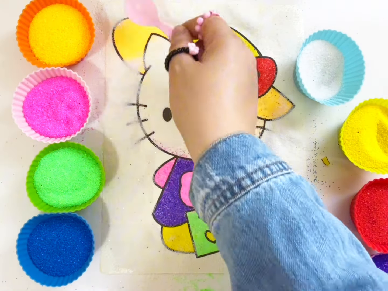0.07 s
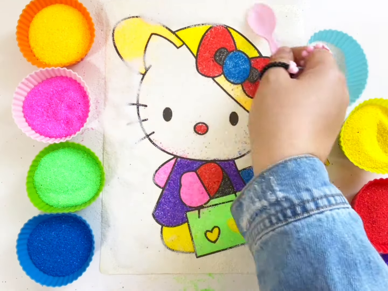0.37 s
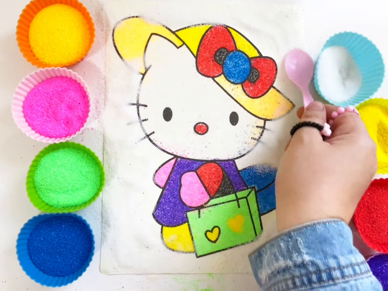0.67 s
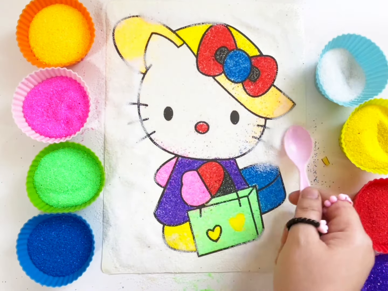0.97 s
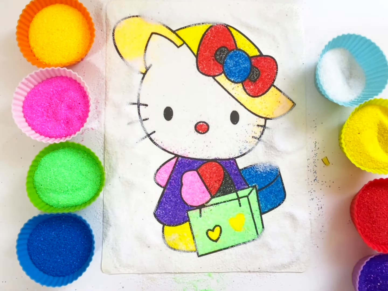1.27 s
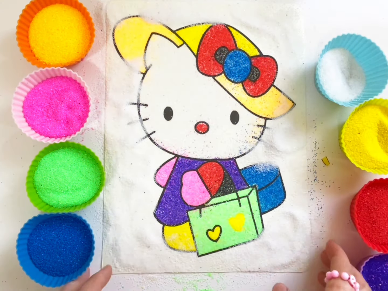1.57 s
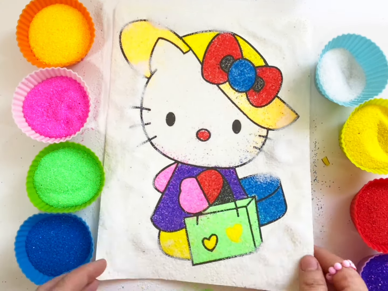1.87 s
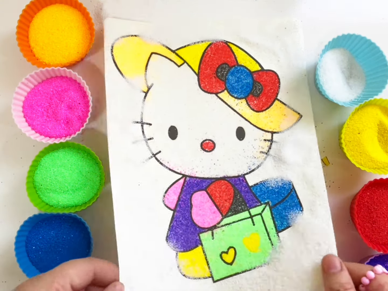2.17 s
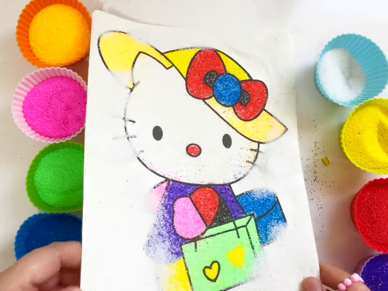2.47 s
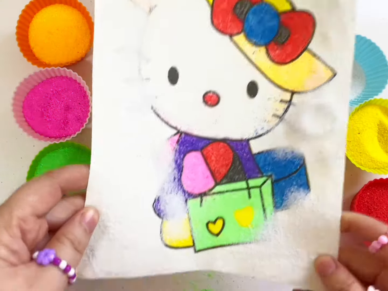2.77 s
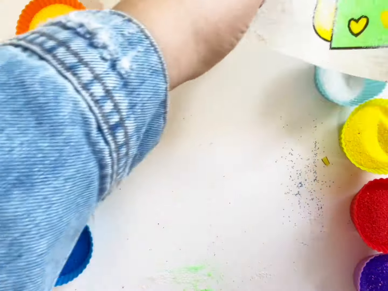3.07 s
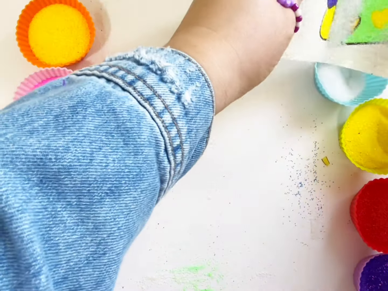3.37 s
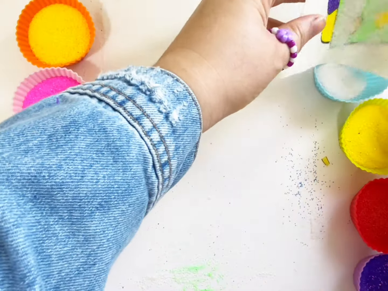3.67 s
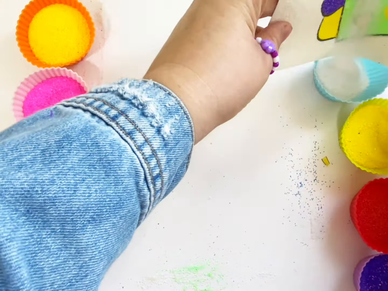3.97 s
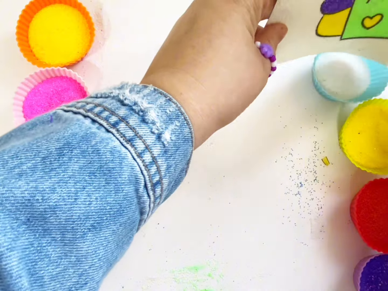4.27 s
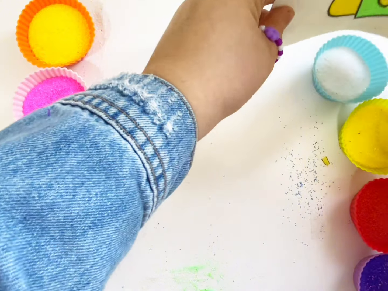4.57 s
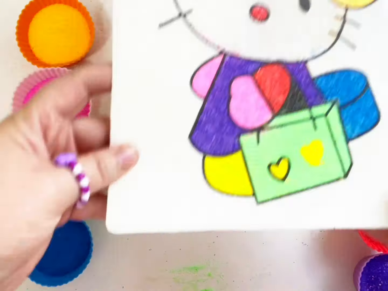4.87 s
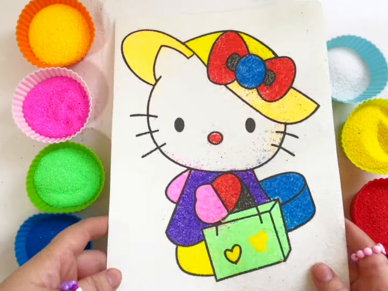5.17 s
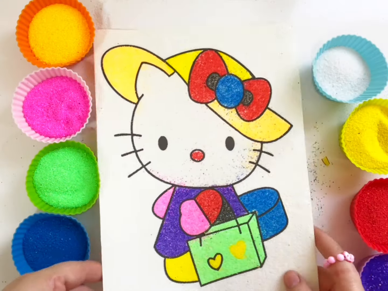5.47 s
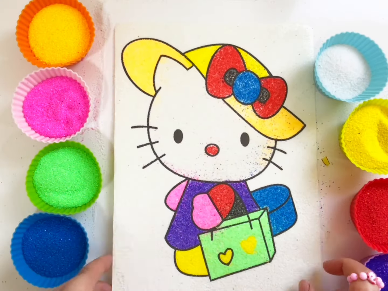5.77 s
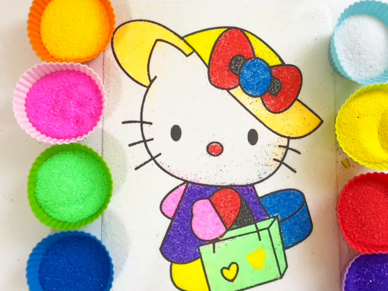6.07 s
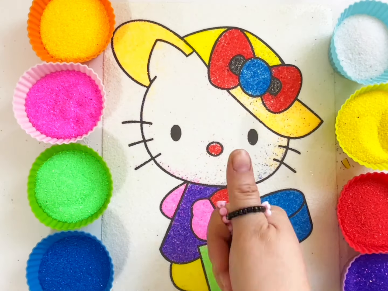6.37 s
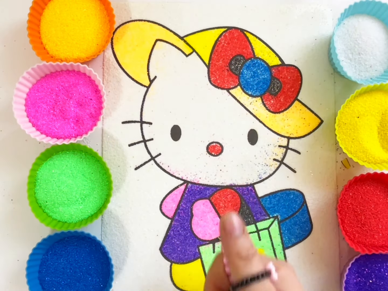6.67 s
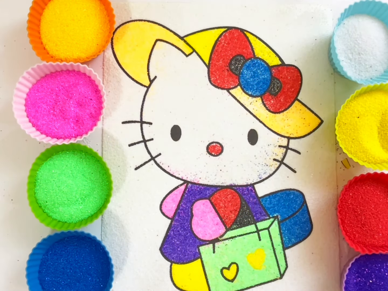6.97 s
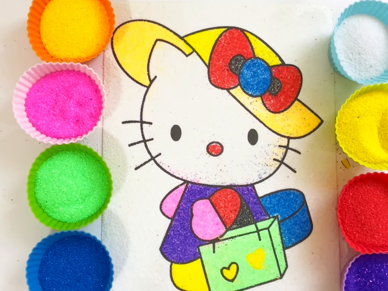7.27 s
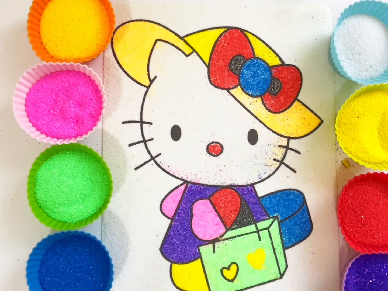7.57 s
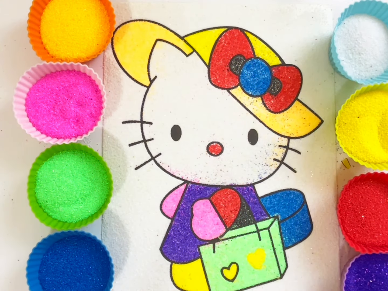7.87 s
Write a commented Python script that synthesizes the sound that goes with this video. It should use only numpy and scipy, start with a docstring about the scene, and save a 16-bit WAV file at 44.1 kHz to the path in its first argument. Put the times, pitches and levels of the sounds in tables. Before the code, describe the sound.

A plastic spoon scrapes sand over paper and clatters down; the sheet crackles as sand hisses off, then is laid back.

```python
"""A plastic spoon crunches sand across a sheet of paper, then clatters onto the table.
The sheet is lifted and tilted: it crackles and buckles, the loose sand hisses off, and it is laid back
with hollow puffs of air. Last, a hand and a denim sleeve brush about over a low room hum.
Heard in a small room, close to two microphone ports."""
import sys
import numpy as np
from scipy import signal
from scipy.fft import rfft, irfft, next_fast_len
from scipy.io import wavfile
from scipy.ndimage import uniform_filter1d

SR = 44100
rng = np.random.default_rng(int(sys.argv[2]) if len(sys.argv) > 2 else 0)


def wav_record(signal):
    """Record a signal, one row per channel, as 16-bit PCM in the file named by sys.argv[1]."""
    frames = np.transpose(np.atleast_2d(signal))
    bounded = np.clip(frames, -1, 1)
    # unit amplitude maps onto the largest positive 16-bit level
    quanta = np.round(bounded * 32767).astype(np.int16)
    wavfile.write(sys.argv[1], SR, quanta)


N = 348831
TIME_S = np.arange(N) / SR
PUSH_ATTACK_S, PUSH_T60_S = 0.018, 0.12   # the spoon bites fast, lets go slowly

# paper snaps and finger taps: time_s, level_db, brightness_db, ring_hz
PAPER_SNAPS = [(1.5775, -53, -5, 690), (1.678, -45, 0, 696), (1.735, -48.5, -6, 2720),
               (1.769, -48, 12, 4870), (1.823, -46, 6, 1590), (1.906, -51, 5, 2230), (2.0623, -43, 2, 1200),
               (2.156, -49, 6.5, 1150), (2.3038, -44.5, 3, 1840), (2.348, -42.5, -2, 4350),
               (2.4776, -42.5, 2.5, 2600), (2.573, -43.5, 5, 1370), (2.8435, -54, 4, 700),
               (3.003, -48, 0, 850), (3.5555, -41.5, -2, 3230), (3.8457, -46.5, -5, 910),
               (4.3034, -42.5, -6, 840), (4.311, -42, -2, 840), (4.4505, -45.5, -10, 770),
               (4.522, -44.5, -4, 834), (4.6648, -56, 4, 700), (4.7788, -51.5, 9, 4530),
               (5.059, -48, -4.5, 750), (5.1449, -41.5, -2.5, 2620), (5.215, -39.5, -3, 2580),
               (5.232, -42, -8.5, 1020), (5.278, -50, 3, 1150), (5.305, -39, -2.5, 2880),
               (5.395, -32.5, -1.5, 2840), (5.4545, -53, -0.5, 2600), (5.4696, -44, -4, 2660),
               (5.4802, -43, 2.5, 1990), (5.5125, -39.5, 4.5, 2320), (5.527, -41, 1, 1510),
               (5.6327, -40.5, 0.5, 2040), (5.647, -41, -1, 2100), (5.7509, -42, -0.5, 1190),
               (5.802, -38, -1.5, 2390)]


def from_db(db):
    """Decibels to gain."""
    return 10 ** (np.asarray(db) / 20)


def unit_rms(x):
    """Scale to unit power."""
    return x / np.sqrt(np.mean(x ** 2) + 1e-20)


def butter(x, kind, cutoff_hz):
    """Butterworth filter, 12 dB per octave."""
    return signal.sosfilt(signal.butter(2, cutoff_hz, kind, fs=SR, output="sos"), x)


def colour(x, spectrum):
    """Unit-energy minimum-phase filter following rows of freq_hz, level_db."""
    size = 2048
    hz, db = np.transpose(spectrum)
    grid_hz = np.maximum(np.fft.rfftfreq(size, 1 / SR), 1)
    cepstrum = irfft(np.log(from_db(np.interp(np.log(grid_hz), np.log(hz), db))))
    cepstrum[1:size // 2] *= 2
    cepstrum[size // 2 + 1:] = 0
    response = irfft(np.exp(rfft(cepstrum)))
    return signal.oaconvolve(x, response / np.linalg.norm(response))[:N]


def held(rows, attack_s, t60_s, arch_db=0):
    """Gain of moves that set in, arch mid-way and decay; the strongest prevails."""
    out = np.zeros(N)
    for start_s, length_s, db in rows:
        first = int(start_s * SR)
        span = slice(first, first + int((length_s + t60_s) * SR))
        age_s = TIME_S[span] - start_s
        bow_db = arch_db * (np.sin(np.pi * np.minimum(age_s / length_s, 1)) - 2 / np.pi)
        decay_db = 60 * np.maximum(age_s - length_s, 0) / t60_s
        gain = np.clip(age_s / attack_s, 0, 1) * from_db(db + bow_db - decay_db)
        out[span] = np.maximum(out[span], gain)
    return out


def swells(rows, fall_s):
    """Gain of moves that rise and fall 20 dB per rise_s (10 ms at least) and fall_s; powers add."""
    power = np.zeros(N)
    for peak_s, rise_s, db in rows:
        rise_s = max(rise_s, 0.01)
        span = slice(max(int((peak_s - 2 * rise_s) * SR), 0), int((peak_s + 2 * fall_s) * SR))
        age_s = TIME_S[span] - peak_s
        power[span] += from_db(db - 20 * np.maximum(-age_s / rise_s, age_s / fall_s)) ** 2
    return np.sqrt(power)


def contacts(rows, tilt=0):
    """One impulse per row; tilt (-1 bass, +1 treble) weights its brightness."""
    out = np.zeros(N)
    for time_s, db, *brightness_db in rows:
        out[round(time_s * SR)] += from_db(db + tilt * sum(brightness_db))
    return out


def bursts(impulses, t60_s, spread_s=0):
    """Each contact starts decaying noise; spread_s smears one that gives way gradually."""
    power = signal.lfilter([1], [1, -from_db(-120 / (t60_s * SR))], impulses ** 2 + 1e-24)
    power = np.maximum(uniform_filter1d(power, 1 + int(spread_s * SR)), 0)
    return np.sqrt(power) * rng.standard_normal(N)


def grains(per_s, spread_db, t60_s):
    """Random tiny contacts, most weak, a few strong; unit power."""
    sizes = from_db(spread_db * np.minimum(rng.exponential(1, N), 4))
    hits = rng.random(N) < per_s / SR
    return unit_rms(bursts(sizes * hits, t60_s))


def strike(blows, modes, rise_s, scatter_db=0, detune=0):
    """Each blow rings all modes, with optional level and pitch scatter; bright blows favour high modes."""
    out = np.zeros(N)
    for k, ((hz, mode_db, t60_s), tilt) in enumerate(zip(modes, np.linspace(-1, 1, len(modes)))):
        age_s = TIME_S[:int(1.5 * t60_s * SR)]
        envelope = (-1) ** k * (1 - np.exp(-age_s / rise_s)) * from_db(-60 * age_s / t60_s)
        for time_s, db, brightness_db in blows:
            louder, higher = rng.standard_normal(2)
            gain = from_db(db + mode_db + tilt * brightness_db + scatter_db * louder)
            ring = envelope * np.sin(2 * np.pi * hz * (1 + detune * higher) * age_s)
            first = round(time_s * SR)
            out[first:first + len(ring)] += gain * ring[:N - first]
    return out


def room_noise(hum_start_s=5.968):
    """Diffuse noise, a little of it common to both ports; steps up to a low hum."""
    # quiet room and humming room spectra: freq_hz, level_db
    quiet_spectrum = [(25, -16), (70, 1), (180, -2.5), (350, -11), (650, -2.5), (1100, -12), (2500, -17),
                      (4700, -23), (6200, -7.5), (8000, -26.5), (12000, -38.5), (15500, -48.5)]
    hum_spectrum = [(25, -13), (70, 0), (140, 3), (190, 2), (240, -9.5), (300, -6.5), (430, -5), (620, 4),
                    (900, -8.5), (1300, -12.5), (2000, -22.5), (4500, -29.5), (6300, -25), (9000, -32.5),
                    (12000, -41), (15500, -58)]

    def diffuse(spectrum, shared):
        common = shared * rng.standard_normal(N)
        return unit_rms(np.array([colour(rng.standard_normal(N) + common, spectrum) for _ in range(2)]))

    quiet = from_db(-68.5) * diffuse(quiet_spectrum, shared=0.14)
    hum = from_db(-64) * diffuse(hum_spectrum, shared=0.37)
    fade = np.clip((TIME_S - hum_start_s) / 0.0071, 0, 1)
    return (1 - fade) * quiet + fade * hum


def spreading():
    """The spoon crushes and drags grains; they scratch the paper and drum the sheet on the table."""
    # spoon pushes: start_s, length_s, crunch_db, scratch_db, drum_db
    pushes = [(0.117, 0.019, -56.5, -60, -73), (0.14, 0.094, -35.5, -46.5, -52.5),
              (0.273, 0.046, -42.5, -56.5, -50), (0.297, 0.055, -39.5, -65.5, -44.5),
              (0.337, 0.1, -40, -53, -54), (0.41, 0.18, -38.5, -56, -53), (0.593, 0.057, -45, -49.5, -51.5),
              (0.66, 0.084, -40.5, -47.5, -54), (0.696, 0.04, -38, -47.5, -39.5),
              (0.747, 0.076, -52.5, -54, -53.5), (0.811, 0.13, -46.5, -59, -46.5),
              (0.874, 0.062, -40.5, -47.5, -48), (0.96, 0.057, -39.5, -47.5, -54)]
    # coarse grains snapping: time_s, level_db
    grain_snaps = [(0.1445, -29), (0.154, -30), (0.169, -33), (0.178, -27), (0.202, -34), (0.214, -33),
                   (0.285, -39), (0.326, -37), (0.332, -32.5), (0.364, -33), (0.423, -32), (0.4277, -21.5),
                   (0.433, -26.5), (0.486, -36), (0.516, -28.5), (0.550, -27), (0.586, -34.5), (0.673, -35),
                   (0.702, -34), (0.886, -30), (0.895, -32), (0.904, -34), (0.935, -31), (0.974, -32),
                   (0.987, -35.5)]
    # crushed sand, scratched paper and drumming sheet spectra: freq_hz, level_db
    crunch_spectrum = [(200, -14.5), (700, -24.5), (2500, -17), (3800, -14.5), (5200, -6), (6200, 0.5),
                       (7600, 1), (10000, -5), (12000, -11), (14000, -19), (15700, -28)]
    scratch_spectrum = [(500, -19), (1500, -4.5), (2500, 2), (3200, -1.5), (4400, 4), (6000, -13),
                        (10000, -26), (15000, -41)]
    drum_spectrum = [(40, -23), (100, -13.5), (200, -3.5), (290, -7.5), (385, 4.5), (490, -4), (625, -0.5),
                     (730, -8), (860, -2.5), (1400, -10.5), (2500, -11.5), (8000, -48.5)]

    def push_gain(layer):
        rows = [(start_s, length_s, dbs[layer]) for start_s, length_s, *dbs in pushes]
        pushing = held(rows, PUSH_ATTACK_S, PUSH_T60_S, arch_db=5)   # fastest mid-push
        rolling_on = from_db(-22.5) * held(rows, PUSH_ATTACK_S, t60_s=0.24, arch_db=5)
        return np.maximum(pushing, rolling_on)

    crushing, scratching, pressing = map(push_gain, range(3))
    grit = unit_rms(grains(per_s=650, spread_db=2.2, t60_s=0.008) + rng.standard_normal(N))
    crunch = from_db(-1.4) * crushing * grit
    snaps = from_db(3.5) * bursts(contacts(grain_snaps), t60_s=0.0093, spread_s=0.00055)
    ticks = from_db(-14.5) * bursts(contacts(grain_snaps), t60_s=0.01, spread_s=0.00068)
    scratch = from_db(-1.5) * scratching * grains(per_s=700, spread_db=1.5, t60_s=0.0052)
    drumming = from_db(-3) * pressing * grains(per_s=900, spread_db=1.5, t60_s=0.017)
    return (colour(crunch + snaps, crunch_spectrum) + colour(scratch + ticks, scratch_spectrum)
            + colour(drumming, drum_spectrum))


def sway():
    """Shifting hands and the jolted sheet give slow swells of rumble."""
    # hands leaning on the table, jolts of the held sheet: time_s, level_db
    leans = [(0.135, -63), (1.5, -64), (1.7, -68), (5.1, -69), (5.994, -63), (6.69, -72), (7.28, -71)]
    jolts = [(3.03, -57), (3.16, -66.5), (3.585, -64.5), (3.92, -68), (4.089, -62.5), (4.245, -59.5),
             (4.33, -67.5)]
    # rumble spectrum: freq_hz, level_db
    spectrum = [(25, -8.5), (55, -4.5), (80, -0.5), (120, -2.5), (190, -7), (300, -11), (1000, -28.5),
                (3000, -56.5)]
    rise_s = 0.04
    motion = swells([(time_s, rise_s, db) for time_s, db in jolts + leans], fall_s=0.32)
    return from_db(-1) * motion * colour(rng.standard_normal(N), spectrum)


def table_bumps():
    """Spoon, hands and paper knock the table's low modes."""
    # soft bumps: time_s, level_db, brightness_db
    bumps = [(0.308, -37, 9), (0.384, -38.5, -4), (0.441, -32, 6), (0.64, -45, -7), (0.714, -34, 21),
             (0.722, -30, 22), (0.897, -36, 13), (1.263, -39.5, 32.5), (1.272, -41.5, -5), (1.29, -36, 5),
             (1.313, -37.5, -12), (1.392, -47, -7), (4.078, -56, -4.5), (4.311, -46, 17.5),
             (5.231, -52, -16.5), (5.508, -36.5, 8), (5.53, -42, 3), (5.655, -42.5, 2), (5.757, -46, 4),
             (5.981, -53.5, -7), (6.064, -54, -2), (6.635, -58, -7), (6.694, -51, -13.5), (6.924, -53, 2.5),
             (7.245, -56, -8), (7.3, -50, -8.5), (7.545, -55, -4.5), (7.61, -54, -5), (7.783, -54, -13)]
    # table modes: freq_hz, level_db, t60_s
    modes = [(72.6, -16, 0.19), (117, -11.5, 0.18), (190, -13.5, 0.36), (361, -8.5, 0.12),
             (420, -11.5, 0.084), (595, -10.5, .05), (866, -8, 0.034), (1070, -14, 0.023)]
    return from_db(-5.5) * strike(bumps, modes, rise_s=0.0016, scatter_db=-2, detune=0.039)


def bowl_ring():
    """Dragged grains keep the spoon's bowl ringing; the grip shifts its pitch from push to push."""
    # ringing pushes: start_s, length_s, level_db, pitch_ratio
    pushes = [(0.416, 0.047, -48, 0.95), (0.49, 0.074, -45, 0.94), (0.89, 0.049, -45.5, 0.99),
              (0.957, 0.036, -43.5, 0.96)]
    # bowl resonances: freq_hz, width_hz, level_db
    resonances = [(2320, 250, -12.5), (4490, 160, -3.5), (6250, 180, 1.5), (8930, 400, -4.5)]
    out = np.zeros(N)
    for start_s, length_s, db, pitch_ratio in pushes:
        grit, ring = rng.standard_normal(SR), np.zeros(SR)
        for hz, width_hz, mode_db in resonances:
            resonator = signal.iirpeak(hz * pitch_ratio, hz / width_hz, fs=SR)
            ring += from_db(mode_db) * unit_rms(signal.lfilter(*resonator, grit))
        out += held([(start_s, length_s, db)], PUSH_ATTACK_S, PUSH_T60_S) * np.resize(unit_rms(ring), N)
    return from_db(1.5) * out


def spoon_clatter():
    """Each blow lands on another spot of the spoon, shifting its ring; loose sand jumps after it."""
    # taps on the sheet, then the drop: time_s, crack_db, brightness_db, ring_db, pitch_ratio
    blows = [(0.8218, -30.5, 7.5, -33, 1.0), (0.8342, -30, 8, -29, 1.02), (0.852, -30, 9.5, -26.5, 0.98),
             (0.8705, -36, 6.5, -44, 1.0), (1.2623, -16, -1.5, -16.5, 0.99), (1.288, -27, -2.5, -25, 0.98),
             (1.302, -33, -5.5, -28.5, 1.08), (1.3052, -14.5, 4.5, -16.5, 1.02),
             (1.3248, -32, -2, -33.5, 1.0), (1.3478, -21, 2, -20.5, 0.98), (1.3662, -26.5, 3, -33, 1.12),
             (1.3717, -23, -0.5, -21.5, 1.02)]
    # spoon modes: freq_hz, level_db, t60_s
    modes = [(1000, -19, 0.028), (1690, -17, 0.012), (2317, -1.5, 0.013), (2548, -3.5, 0.014),
             (3436, -2.5, 0.007), (5794, -12.5, 0.01), (6900, -9.5, 0.009), (8400, -5.5, 0.008),
             (10400, -2, 0.0075), (11750, -11, 0.005)]
    # spectrum of plastic crack and jumping sand: freq_hz, level_db
    spectrum = [(200, -7.5), (750, -4), (1500, -4), (2450, 2.5), (3000, -2), (3700, 0), (4800, -2.5),
                (6700, -1.5), (9000, 5.5), (11300, -6.5), (14500, -26)]
    ring = np.zeros(N)
    for time_s, _, brightness_db, ring_db, pitch_ratio in blows:
        shifted = [(hz * pitch_ratio, db, t60_s) for hz, db, t60_s in modes]
        ring += strike([(time_s, ring_db, brightness_db)], shifted, rise_s=0.00028)
    hits = [row[:3] for row in blows]
    crack = from_db(-4) * bursts(contacts(hits, tilt=1), t60_s=0.006, spread_s=0.0011)
    jumping_sand = from_db(-18.5) * bursts(contacts(hits), t60_s=0.15)
    return from_db(-3) * ring + colour(crack + jumping_sand, spectrum)


def sheet_lift():
    """Paper rubs on table and fingers as it is dragged off, bent and held."""
    # drags, faint finger rub: start_s, length_s, level_db
    drags = [(1.40, 0.051, -68.5), (1.622, 0.032, -58.5), (1.712, 0.049, -60.5), (1.805, 0.14, -60),
             (2.02, 0.034, -61.5), (2.11, 0.046, -66), (2.25, 0.097, -66.5), (2.48, 0.062, -66.5)]
    holding = [(1.63, 1.7, -75.5)]
    # paper friction spectrum: freq_hz, level_db
    spectrum = [(80, 0), (200, -1.5), (500, 3.5), (900, 0), (1400, 4.5), (2600, 5), (4000, 1.5), (6500, 3),
                (8800, 2.5), (11000, -6), (13000, -74)]
    motion = from_db(4.5) * held(drags + holding, attack_s=0.012, t60_s=0.51)
    return colour(motion * grains(per_s=600, spread_db=1.5, t60_s=0.02), spectrum)


def crackles():
    """Short paper snaps, each with a dull and a crisp part."""
    # snap spectrum: freq_hz, level_db
    spectrum = [(200, -3.5), (900, -1), (1500, 3.5), (2700, 0.5), (4000, 2.5), (6500, 3.5), (9000, 8),
                (11300, -9.5), (13000, -42), (15500, -43)]
    snaps = [row[:3] for row in PAPER_SNAPS]
    split_hz = 3500
    dull = butter(bursts(contacts(snaps, tilt=-1.03), t60_s=0.019, spread_s=0.0017), "low", split_hz)
    crisp = butter(bursts(contacts(snaps, tilt=1), t60_s=0.01, spread_s=0.0015), "high", split_hz)
    return colour(from_db(-3.5) * dull + from_db(1) * crisp, spectrum)


def paper_rings(t60_s=0.011, edge_ratio=1.18):
    """Each snapping patch of paper rings briefly and roughly, at a pitch set by its size."""
    out = np.zeros(N)
    age_s = TIME_S[:int(2 * t60_s * SR)]
    for time_s, db, _, hz in PAPER_SNAPS:
        burst = rng.standard_normal(len(age_s)) * from_db(-60 * age_s / t60_s)
        ring = butter(burst, "band", [hz / edge_ratio, hz * edge_ratio])
        first = round(time_s * SR)
        out[first:first + len(ring)] += from_db(db) * ring / np.abs(ring).max()
    return from_db(-5.5) * out


def pouring(spurts_per_s=22, spurt_db=1.47):
    """Countless grains slide down the sheet in uneven spurts and merge into a fine hiss."""
    # flow off the tilted sheet: time_s, level_db
    flow_curve = [(2.55, -59.5), (2.75, -70.5), (3.05, -69), (3.2, -52.5), (3.3, -55.5), (3.48, -53.5),
                  (3.58, -59), (3.8, -54), (4.08, -54.5), (4.3, -61), (4.6, -64.5), (4.9, -76)]
    # small slips as the sheet moves: peak_s, rise_s, level_db
    slips = [(1.68, 0.1, -66), (1.89, -0.35, -54), (2.08, 0.02, -53.5), (2.3, 0.19, -54), (2.58, 0.2, -54),
             (2.665, -0.03, -61), (2.85, -0.28, -59), (3.48, -0.05, -50.5), (3.81, 0.39, -54.5),
             (3.97, -0.17, -51.5), (4.1, -0.7, -62), (4.47, 1, -66), (4.632, -1.6, -54.5),
             (4.932, -0.06, -55.5)]
    # sliding sand spectrum: freq_hz, level_db
    spectrum = [(150, -3), (400, -17), (900, -3), (1500, -6), (2200, -3), (4500, -2.5), (5800, 2.5),
                (8800, 4.5), (10300, 3.5), (11800, -8.5), (13100, -26), (14000, -36), (15500, -46)]
    hiss = colour(grains(per_s=12000, spread_db=3.5, t60_s=0.0034), spectrum)
    time_s, db = np.transpose(flow_curve)
    outside_s = np.maximum(time_s[0] - TIME_S, 0) + np.maximum(TIME_S - time_s[-1], 0)
    stream = from_db(np.interp(TIME_S, time_s, db)) * np.maximum(1 - outside_s / 0.019, 0)
    wander = np.interp(TIME_S * spurts_per_s, np.arange(400), rng.standard_normal(400))
    flow = np.hypot(stream * from_db(spurt_db * wander), swells(slips, fall_s=0.041))
    return from_db(2.5) * flow * hiss


def sheet_flex():
    """The free sheet flutters as it is tipped; buckling rings its modes."""
    # flutters: start_s, length_s, level_db
    flutters = [(2.994, 0.019, -58.5), (3.04, 0.048, -61), (3.09, 0.062, -57), (3.235, 0.026, -65)]
    # flutter spectrum: freq_hz, level_db
    spectrum = [(200, -27), (420, -14), (520, 8), (650, -14), (870, -2.5), (1300, -22), (3000, -35)]
    # buckles: time_s, level_db, brightness_db
    buckles = [(3.010, -45, -5.5), (3.556, -39.5, 8), (4.319, -53, -0.5)]
    # free sheet modes: freq_hz, level_db, t60_s
    modes = [(79.7, -4, 0.54), (161, -8.5, 0.066), (507, -1, 0.057), (850, -4.5, 0.022)]
    buckling = from_db(0.5) * strike(buckles, modes, rise_s=0.0016)
    tipping = held(flutters, attack_s=0.0027, t60_s=0.21, arch_db=1.5)
    return buckling + tipping * colour(grains(per_s=280, spread_db=1.5, t60_s=0.045), spectrum)


def sheet_laying(puff_lag_s=0.0076, puff_rise_s=0.027):
    """Each shove swells until the paper catches; just after, the air under it escapes in a puff."""
    # shoves: peak_s, rise_s, rub_db, puff_db
    shoves = [(4.631, 1, -65, -72), (4.927, 0.03, -64.5, -85), (5.062, -1.5, -70.5, -62.5),
              (5.227, 0.17, -55.5, -57), (5.307, 0.3, -60, -69), (5.388, 0.06, -47, -59),
              (5.516, 0.0637, -43, -49.5), (5.638, 0.09, -55, -57), (5.685, 0.67, -62.5, -67.5),
              (5.752, -0.35, -49.5, -56.5), (5.783, -0.21, -50, -62), (5.802, 0.16, -60.5, -60.5)]
    # sliding paper and hollow puff spectra: freq_hz, level_db
    slide_spectrum = [(100, 1), (500, -6), (900, -2.5), (1500, 2), (2100, 2.5), (2750, 6), (3800, -2.5),
                      (6500, 0), (8800, 0.5), (11000, -10.5), (13000, -64)]
    puff_spectrum = [(40, -15), (130, 4.5), (230, -10), (400, 7), (540, 3.5), (900, -7), (3000, -41)]
    shoving = swells([row[:3] for row in shoves], fall_s=0.047)
    slide = from_db(-1) * shoving * grains(per_s=900, spread_db=1, t60_s=0.012)
    escaping = swells([(peak_s + puff_lag_s, puff_rise_s, db) for peak_s, *_, db in shoves], fall_s=0.051)
    puffs = from_db(-4) * escaping * rng.standard_normal(N)
    return colour(slide, slide_spectrum) + colour(puffs, puff_spectrum)


def brushing():
    """Skin and cloth rub in soft, bell-shaped swishes."""
    # hand and sleeve swishes: peak_s, width_s, level_db
    swishes = [(6.33, 0.026, -77), (6.81, 0.025, -78), (6.979, 0.047, -75.5), (7.342, 0.025, -59),
               (7.385, 0.033, -63), (7.635, 0.024, -75.5), (7.76, 0.083, -65.5)]
    # denim friction spectrum: freq_hz, level_db
    spectrum = [(300, -7), (700, -9), (1400, -10), (2800, -6.5), (4500, -6.5), (6500, -7), (8800, -1),
                (10500, -5), (12000, -83)]
    speed = sum(from_db(db) * np.exp(-0.5 * ((TIME_S - peak_s) / width_s) ** 2)
                for peak_s, width_s, db in swishes)
    return from_db(4) * speed * colour(grains(per_s=4400, spread_db=1.5, t60_s=0.0066), spectrum)


def ports(x, response):
    """Two ports hear a near sound at slightly different levels, out of step in the treble."""
    hz, lag_rad, balance_db = np.transpose(response)
    size = next_fast_len(N + 4096)
    grid_hz = np.fft.rfftfreq(size, 1 / SR)
    lean = from_db(np.interp(grid_hz, hz, balance_db) / 2)
    lag = np.exp(-1j * np.interp(grid_hz, hz, lag_rad))
    spectrum = rfft(x, size)
    return irfft([spectrum * lean, spectrum / lean * lag], size)[:, :N]


def reflections(x, t60_s, top_hz):
    """Dense echoes off table or walls, different at each port."""
    age_s = TIME_S[:int(t60_s * SR)]
    tails = rng.standard_normal((2, len(age_s))) * from_db(-60 * age_s / t60_s) * (age_s > 0.001)
    tails /= np.linalg.norm(tails, axis=1, keepdims=True)
    return signal.oaconvolve(x[None], butter(tails, "band", [170, top_hz]), axes=1)[:, :N]


def shifting_echoes(x, hands_hz=2.3, sheet_hz=5.9):
    """Moving hands and sheet crossfade four patterns of near echoes."""
    hands_rad, sheet_rad = 2 * np.pi * hands_hz * TIME_S, 2 * np.pi * sheet_hz * TIME_S
    shares = [a * b for a in (np.cos(hands_rad), np.sin(hands_rad))
              for b in (np.cos(sheet_rad), np.sin(sheet_rad))]
    return sum(reflections(x * share, t60_s=0.026, top_hz=6500) for share in shares)


def scene():
    """Near sounds ahead, the pour to one side, their echoes and the room noise."""
    # port responses, ahead and to the side: freq_hz, right_lag_rad, left_minus_right_db
    front_response = [(20, 0, 0), (200, -.1, -3.5), (430, -.5, -1), (660, 1.5, -10), (1100, .8, -1),
                      (1700, .1, -1.5), (3000, 1.2, -4), (4000, 1.2, -.5), (4800, 3.1, -1), (5300, 5.4, -1),
                      (6200, 6.4, 0), (7000, 7.2, 0), (8200, 9, 0), (9900, 9.4, 0), (11500, 12.4, 0),
                      (16000, 12.9, 0)]
    side_response = [(20, 0, 0), (500, -.5, 1), (750, .4, -6), (1400, .4, -9), (2200, .2, 1), (2900, 3, -2),
                     (3900, 1.2, -2), (4800, 3.3, -2), (5300, 6, -1), (7200, 6.7, 0), (8200, 9, 0),
                     (9900, 9.4, 0), (11500, 12.4, 0), (16000, 12.6, 0)]
    rubbing = spreading() + bowl_ring() + sheet_lift() + sheet_laying() + brushing()
    knocks = butter(sway() + table_bumps() + sheet_flex(), "low", 1500)   # soft contacts lack treble
    snaps = spoon_clatter() + crackles() + paper_rings()
    pour = pouring()
    ahead = rubbing + snaps + knocks
    table = shifting_echoes(from_db(-4) * (rubbing + pour) + from_db(-5.5) * snaps + from_db(-3.5) * knocks)
    walls = from_db(-18) * reflections(ahead + pour, t60_s=0.2, top_hz=6940)
    return ports(ahead, front_response) + ports(pour, side_response) + table + walls + room_noise()


def record(dry):
    """Steep treble cut."""
    cutoff_hz = 15800
    return signal.sosfilt(signal.ellip(10, 0.1, 80, cutoff_hz, fs=SR, output="sos"), dry)


dry = scene()
out = record(dry)
wav_record(out)
```